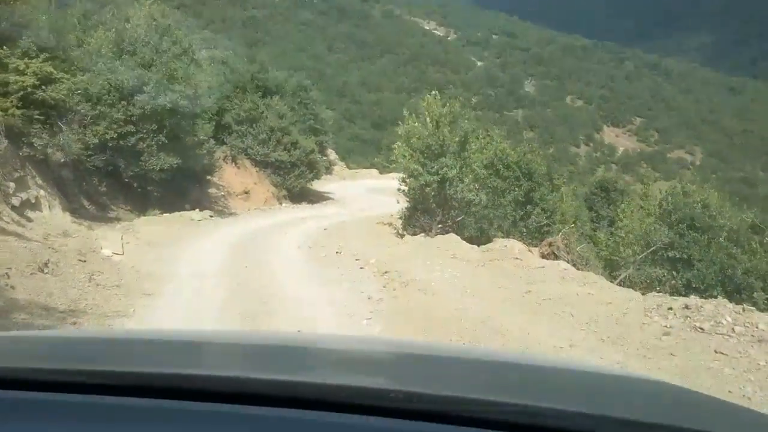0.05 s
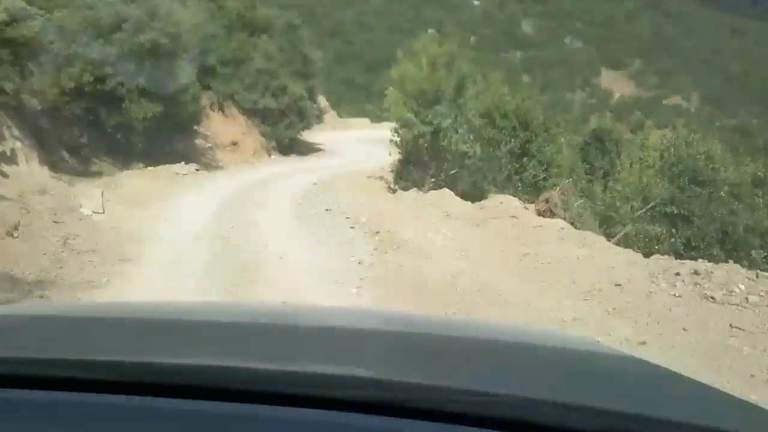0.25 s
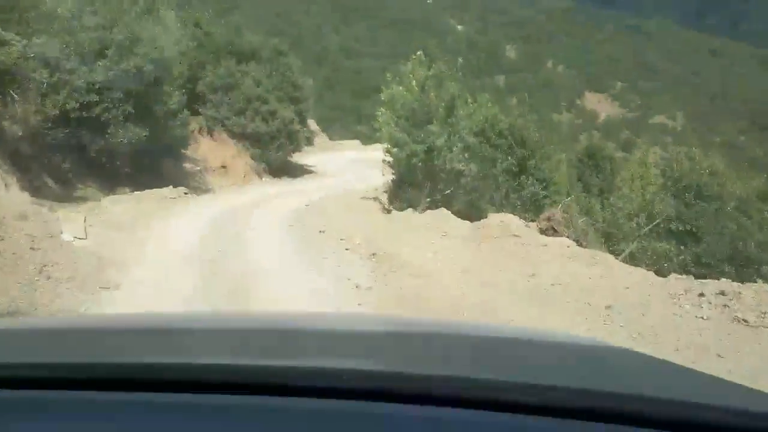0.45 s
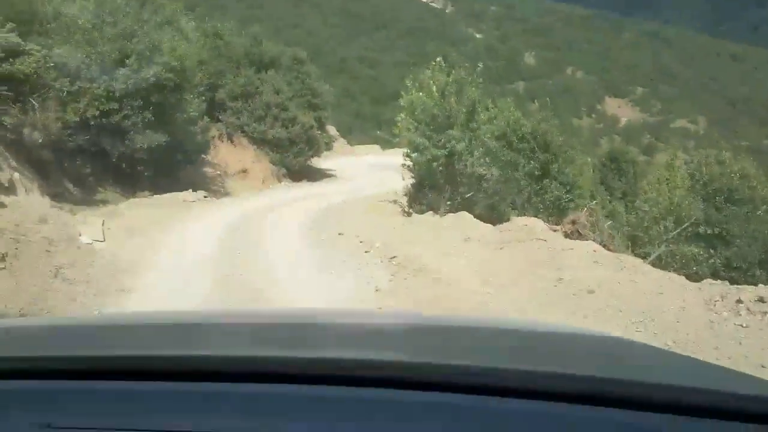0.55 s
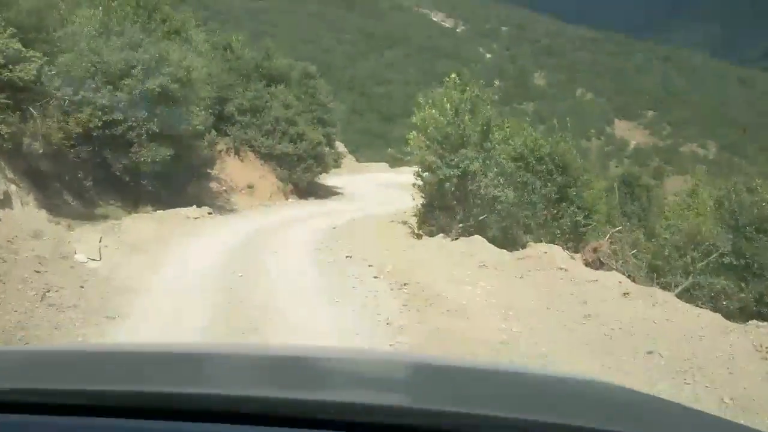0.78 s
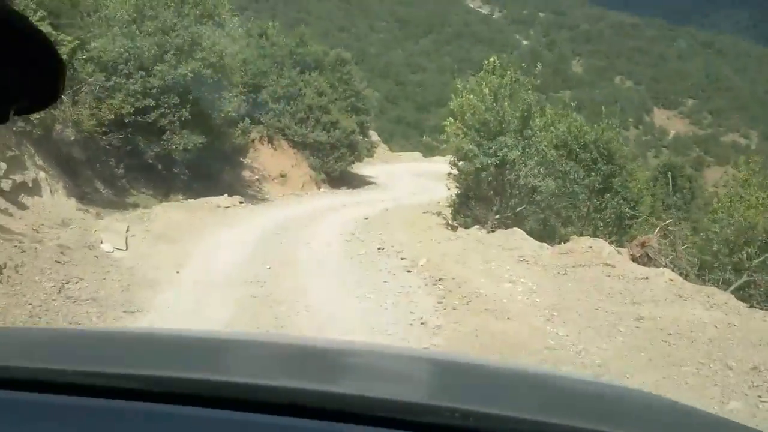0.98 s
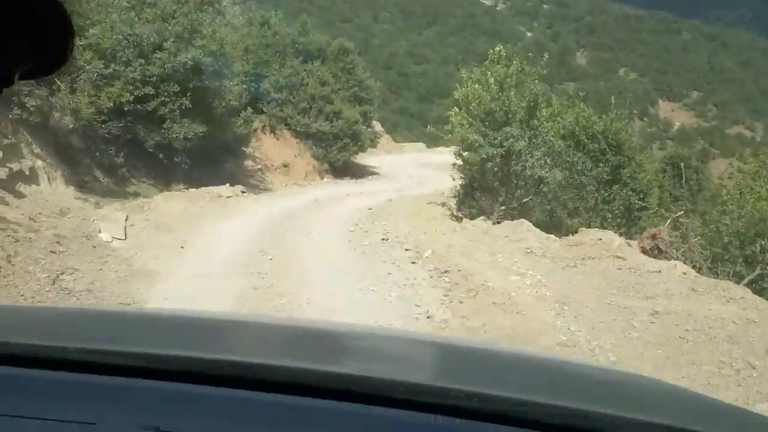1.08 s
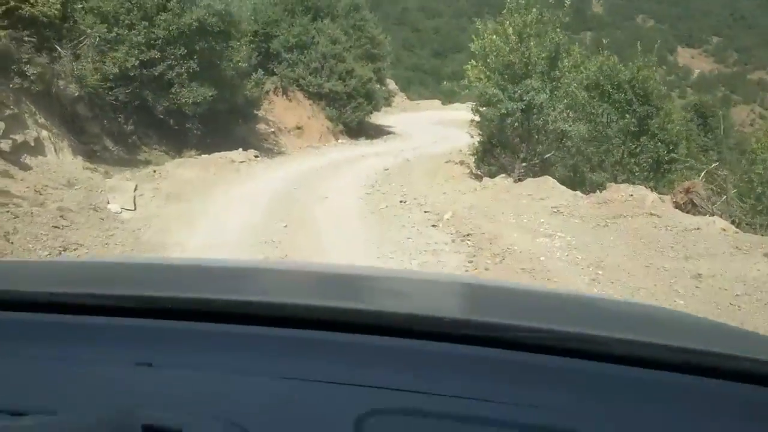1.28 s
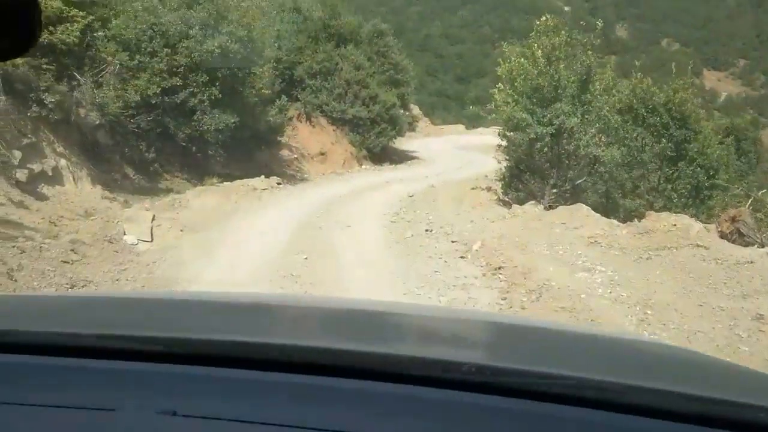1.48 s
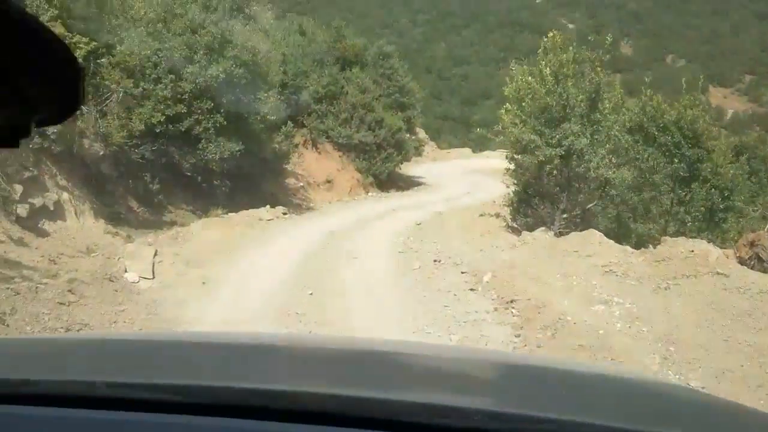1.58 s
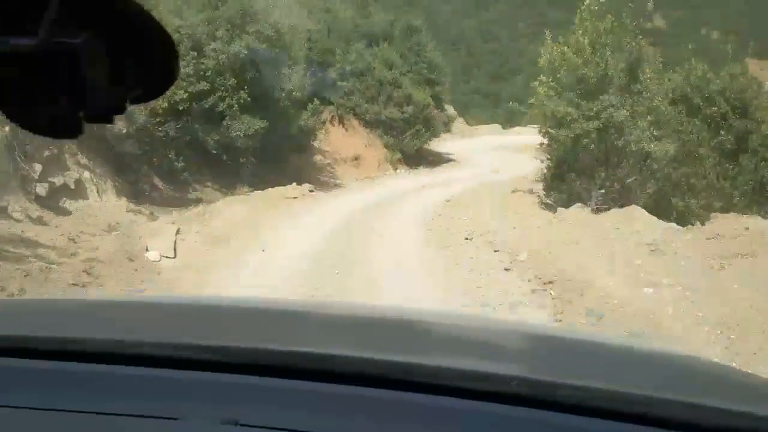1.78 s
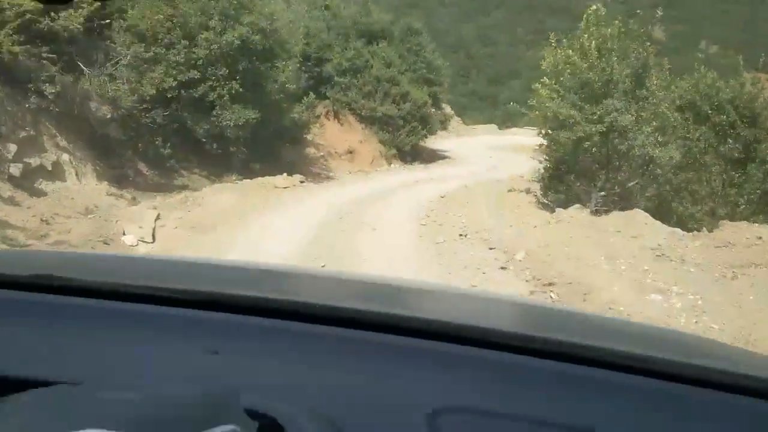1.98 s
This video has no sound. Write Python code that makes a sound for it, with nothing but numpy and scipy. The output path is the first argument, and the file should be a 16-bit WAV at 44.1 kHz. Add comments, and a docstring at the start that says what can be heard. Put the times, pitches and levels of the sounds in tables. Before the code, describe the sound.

Low tyre rumble, muffled grit and engine drone fill the cabin of a slow car on a dirt road. Close to the microphone, a plastic panel clatters sharply early on and knocks again near the end, with faint creaks between.

```python
"""Tyres rumble through the body over a low engine drone, heard from the front seat of a car crawling
along a dirt track. A thin steady hiss lies under it all, with a few low soft thuds.
Two jolts knock hard plastic close to the microphone, ringing a panel; the first one chatters on.
The trim rubs in creaks and ticks, and a faint, very high squeal comes and goes."""
import sys
import numpy as np
from scipy.fft import rfft, irfft, next_fast_len
from scipy.io import wavfile
from scipy.ndimage import map_coordinates

SR = 44100
rng = np.random.default_rng(int(sys.argv[2]) if len(sys.argv) > 2 else 0)


def to_wav(s):
    """Save 16-bit WAV."""
    ch = np.atleast_2d(s).T  # columns
    pcm = np.round(np.clip(ch, -1, 1) * 32767)  # PCM
    wavfile.write(sys.argv[1], SR, pcm.astype(np.int16))


N = 90404

# engine at a crawl: t/s, firing rate/Hz, level/dB
ENGINE_RUN = [(0, 59.55, -42.5), (.25, 60.91, -41), (.55, 57.84, -37.5), (.95, 57, -39),
              (1.35, 60.99, -37.5), (1.65, 55.93, -47.5), (2.05, 58.94, -37)]
# engine orders: multiple of the firing rate, relative level/dB
ENGINE_ORDERS = [(1, -17), (1.5, -10), (2, -3.5), (2.5, -11), (3, -14), (4.5, -15.5), (6, -15.5)]
# roughness of the track: t/s, rumble level/dB, grit level/dB
TRACK_ROUGHNESS = [(0, -40, -49), (.25, -35, -48), (.5, -35, -46), (.7, -36, -48.5), (.9, -37, -46.5),
                   (1.15, -40.5, -49), (1.45, -35, -46.5), (1.62, -33, -48), (1.88, -36.5, -45.5),
                   (2.05, -36.5, -46.5)]
# tyre rumble through the body: f/Hz, relative level/dB
RUMBLE_SPECTRUM = [(18, -63), (30, -6), (42, -6.5), (62, -1.5), (85, -4.5), (125, 1), (165, -6.5),
                   (215, -13.5), (350, -13), (480, -21), (800, -33), (2000, -83)]
# grit under the tyres, from inside: f/Hz, relative level/dB
GRIT_SPECTRUM = [(150, -6), (380, 5), (570, 0.5), (680, -3.5), (850, -2.5), (1100, -8.5), (1500, -13.5),
                 (2300, -19), (3500, -25), (8000, -40)]
# background hiss: f/Hz, relative level/dB
HISS_SPECTRUM = [(1000, -14), (3500, -17.5), (4800, -7), (5500, -2.5), (5900, 3.5), (6400, -2.5),
                 (7200, -12), (8400, -20), (12000, -22.5), (15500, -21.5)]
# low soft thuds: t/s, level/dB, f/Hz, length/s
LOW_THUDS = [(.228, -21, 140, .05), (.345, -23.5, 77.3, 0.065), (0.378, -19, 126, 0.038),
             (0.418, -29.5, 85.2, 0.1), (1.498, -22.5, 111, 0.025), (1.762, -20.5, 118, 0.024)]
# hard plastic contacts: t/s, level/dB, t60/s, tilt/(dB per octave)
PLASTIC_CLICKS = [(0.3311, -14.5, 0.032, -2.6), (0.3328, -17.5, 0.0033, 10), (.340, -26.5, 0.018, 17),
                  (.346, -21, 0.039, -3.5), (0.35, -32, .008, -.5), (0.3682, -28.5, 0.034, -2.5),
                  (.373, -23, 0.0084, 1.5), (0.3778, -34, 0.016, 10), (0.3823, -18.5, 0.0083, 1.5),
                  (0.387, -42.5, 0.2, -1.5), (1.75, -27.5, 0.0083, -0.5), (1.751, -22.5, 0.017, 0),
                  (1.776, -47.5, 0.076, -1)]
# one plastic contact before its tilt: f/Hz, relative level/dB
CLICK_SPECTRUM = [(300, 7.5), (1000, 1.5), (1600, 2.5), (2200, 0.5), (3000, -3), (4000, -4.5), (5200, -1),
                  (5900, 10), (6500, 2.5), (7300, -6.5), (11000, -6.5), (13500, -12), (15500, -12)]
# blows on the panel: t/s, thud level/dB, contact time/ms, boom level/dB, f the struck spot favours/Hz
PANEL_KNOCKS = [(0.3318, -9.5, 0.59, -27, 1190), (.3525, -18, 2.5, -29.5, 142),
                (0.3724, -36, 1.2, -36, 140), (0.381, -26, 0.26, -40, 420), (1.7513, -21.5, 0.21, -34, 904)]
# modes of the panel: f/Hz, relative level/dB, t60/s
PANEL_MODES = [(98.6, -15, 0.34), (139.3, -8.5, 0.21), (174.3, 3.5, 0.069), (219.7, 1, 0.049),
               (270, -10.5, 0.072), (293, -7, 0.12), (355, -13, 0.11), (414.6, -19, 0.29),
               (500, -16.5, 0.065), (566, -16.5, 0.075), (876, -17.5, 0.036), (900, -13, 0.032),
               (1143, -19.5, 0.052), (1312, -19, .051), (1783, -20.5, 0.064)]
# the cabin's answer to a knock: f/Hz, relative level/dB
BOOM_SPECTRUM = [(30, -39), (60, 5), (130, -5.5), (220, 6), (400, -9.5), (700, -11.5), (1500, -24.5),
                 (3000, -29), (8000, -52.5)]
# rubbing trim: t/s, length/s, level/dB, centre f/Hz, half-width/octaves
TRIM_CREAKS = [(0.432, .022, -65, 8600, 0.23), (.53, 0.017, -56, 2250, 0.1),
               (0.554, 0.013, -53, 2150, 0.15), (0.612, 0.065, -57, 2130, .22),
               (0.781, 0.06, -58.5, 2320, 0.2), (0.819, .026, -56, 9800, 0.41),
               (0.851, 0.058, -48, 1780, 0.81), (0.86, 0.04, -55, 3600, .3), (1.054, .018, -67, 9000, .7),
               (1.308, 0.019, -56, 4500, 0.64), (1.43, .014, -68, 9800, .15),
               (1.47, 0.046, -42.5, 565, 0.11), (1.471, 0.033, -51, 1139, 0.15),
               (1.629, 0.026, -56.5, 2170, 0.16), (1.654, .022, -60, 2160, 0.16),
               (1.965, 0.051, -60, 2330, 0.26)]
# spells of squealing: t/s, length/s, level/dB
SQUEAL_SPELLS = [(.48, 0.14, -67), (.64, .13, -66), (0.806, 0.076, -63)]


def amp(db):
    """Decibels to gain."""
    return 10 ** (np.asarray(db) / 20)


def unit(x):
    """Scale to rms 1."""
    return x / np.sqrt(np.mean(x ** 2) + 1e-20)


def curves(rows):
    """One value per sample for each column after the time."""
    s, *cols = np.transpose(rows)
    return [np.interp(np.arange(N) / SR, s, c) for c in cols]


def wobble(rate):
    """A smooth random curve, rate knots a second."""
    return map_coordinates(rng.standard_normal(int(N * rate / SR) + 4), [np.arange(N) * rate / SR])


def filtered(x, response):
    """x times a gain that depends on frequency."""
    m = next_fast_len(len(x) + SR // 4)
    return irfft(rfft(x, m) * response(np.fft.rfftfreq(m, 1 / SR)), m)[:len(x)]


def noise(spectrum):
    """Noise of rms 1 coloured by (f/Hz, level/dB) points."""
    f, db = np.transpose(spectrum)
    white = rng.standard_normal(N)
    return unit(filtered(white, lambda hz: amp(np.interp(np.log(hz + 1), np.log(f), db))))


def strike(t, rise, t60):
    """A fast rise and an exponential decay."""
    return (1 - np.exp(-t / rise)) * np.exp(-np.log(1000) * t / t60)


def since(s):
    """Seconds since s, zero before it."""
    return np.maximum(np.arange(N) / SR - s, 0)


def swell(s, length):
    """One smooth rise and fall."""
    return np.sin(np.pi * np.minimum(since(s) / length, 1)) ** 2


def engine(waver_db=1.8):
    """The engine drones in the cabin on low orders of its firing rate, each wavering on its own."""
    firing_hz, level_db = curves(ENGINE_RUN)
    firings = np.cumsum(firing_hz) / SR
    drone = np.zeros(N)
    for order, order_db in ENGINE_ORDERS:
        gain = amp(level_db + order_db + waver_db * wobble(8.29))
        drone += gain * np.sin(2 * np.pi * (order * firings + rng.random()))
    return np.sqrt(2) * drone


def tyres(jolt_db=0.9, crunch_db=2.0):
    """Tyres on dirt, heard through the body: a low rumble and a muffled crunch of grit."""
    rumble_db, grit_db = curves(TRACK_ROUGHNESS)
    rumble = amp(rumble_db + jolt_db * wobble(18)) * noise(RUMBLE_SPECTRUM)
    grit = amp(grit_db + crunch_db * wobble(60.14)) * noise(GRIT_SPECTRUM)
    return rumble + grit


def hiss(level_db=-59.5):
    """A thin steady hiss in the background."""
    return amp(level_db) * noise(HISS_SPECTRUM)


def low_thuds():
    """Low soft thuds of a few cycles each, some alone and some under the knocks."""
    return sum(amp(db) * swell(start, length) * np.sin(2 * np.pi * hz * since(start))
               for start, db, hz, length in LOW_THUDS)


def plastic_clicks(rise_s=0.00021, grain_db=3, grains_per_s=1500):
    """Loose plastic close to the microphone chatters at the jolts, in gritty cracks."""
    out = np.zeros(N)
    for start, db, t60, tilt in PLASTIC_CLICKS:
        spectrum = [(hz, level + tilt * np.log2(hz)) for hz, level in CLICK_SPECTRUM]
        crack = unit(noise(spectrum) * amp(grain_db * wobble(grains_per_s)))
        out += amp(db) * strike(since(start), rise_s, t60) * crack
    return out


def contact_gain(hz, contact_ms):
    """The longer a contact lasts, the less it drives the high frequencies."""
    return 1 / np.hypot(1, 2 * hz * contact_ms / 1000)


def panel_knocks(push_db=2.5, push_s=0.00271, favour_db=9, favour_octaves=0.17, scatter_db=1):
    """Close by, each blow pushes the air once and rings the panel; the cabin booms briefly around it."""
    out = np.zeros(N)
    for start, thud_db, contact_ms, boom_db, favoured_hz in PANEL_KNOCKS:
        t = since(start)
        pressure_swing = np.sin(2 * np.pi * np.minimum(t / push_s, 1))
        out -= amp(thud_db + push_db) * contact_gain(1 / push_s, contact_ms) * pressure_swing
        for hz, mode_db, t60 in PANEL_MODES:
            travel_s = 0.00188 * (1000 / hz) ** 0.28  # lower bending waves cross the panel later
            ring_t = since(start + travel_s)
            spot_db = favour_db * np.exp(-(np.log2(hz / favoured_hz) / favour_octaves) ** 2)
            ring_db = thud_db + mode_db + spot_db + scatter_db * rng.standard_normal()
            ring = strike(ring_t, rise=0.0015, t60=t60) * np.sin(2 * np.pi * hz * ring_t)
            out -= amp(ring_db) * contact_gain(hz, contact_ms) * ring
        out += amp(boom_db) * strike(t, rise=0.0032, t60=0.22) * noise(BOOM_SPECTRUM)
    return out


def trim_creaks(slip_db=2.5, slips_per_s=700):
    """Cabin trim rubs in short grainy bursts, each around its own resonance."""
    out = np.zeros(N)
    for start, length, db, centre_hz, half_width in TRIM_CREAKS:
        slips = rng.standard_normal(N) * amp(slip_db * wobble(slips_per_s))
        resonance = lambda hz: 1 / (1 + (np.log2((hz + 1) / centre_hz) / half_width / 2) ** 2) ** 3
        out += amp(db) * swell(start, length) * unit(filtered(slips, resonance))
    return out


def squeal(pitch_hz=14430, waver_hz=55, flutter_db=3):
    """A faint fluttering whistle in short spells, perhaps a rubbing brake."""
    hz = pitch_hz + waver_hz * wobble(150)
    spells = sum(amp(db) * swell(start, length) for start, length, db in SQUEAL_SPELLS)
    flutter = amp(flutter_db * wobble(70))
    return spells * flutter * np.sin(2 * np.pi * np.cumsum(hz) / SR)


def scene():
    """The cabin from the front seat, in mono."""
    bed = engine() + tyres() + hiss()
    impacts = low_thuds() + plastic_clicks() + panel_knocks()
    return (bed + impacts + trim_creaks() + squeal())[None]


def record(dry, low_cut_hz=45, top_hz=15900, fade_hz=200):
    """The microphone drops the deepest bass and fades to nothing just above its band limit."""
    thinned = filtered(dry[0], lambda hz: 1 / np.hypot(1, (low_cut_hz / (hz + 1)) ** 6))
    return filtered(thinned, lambda hz: np.clip((top_hz - hz) / fade_hz + 1, 0, 1))[None]


dry = scene()
out = record(dry)
to_wav(out)
```